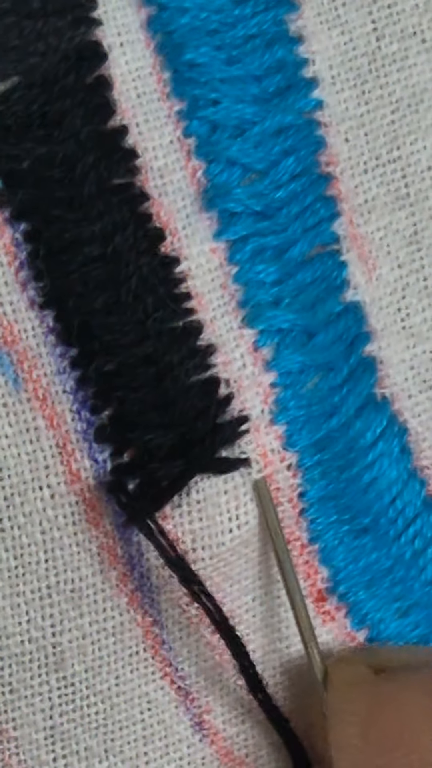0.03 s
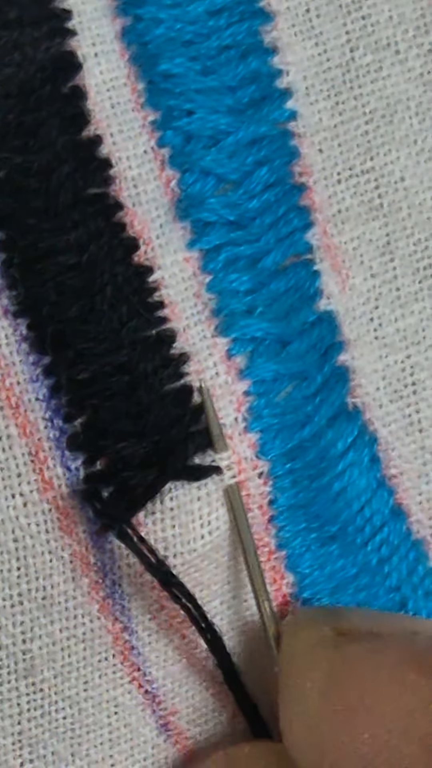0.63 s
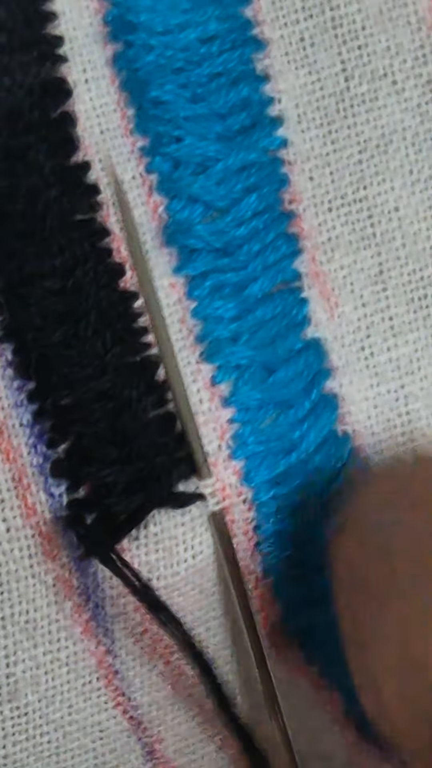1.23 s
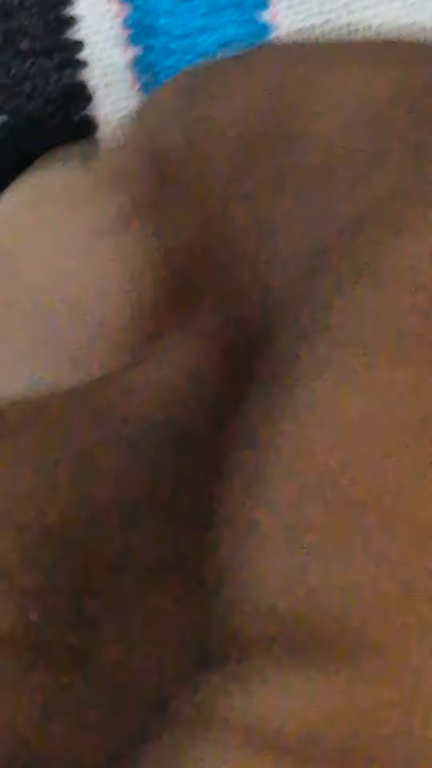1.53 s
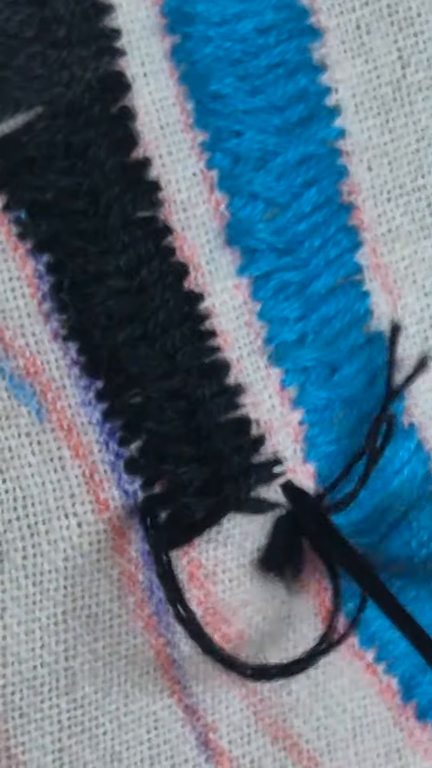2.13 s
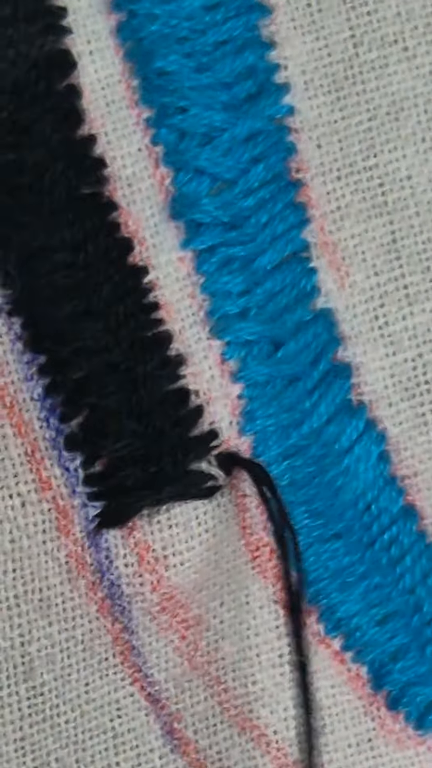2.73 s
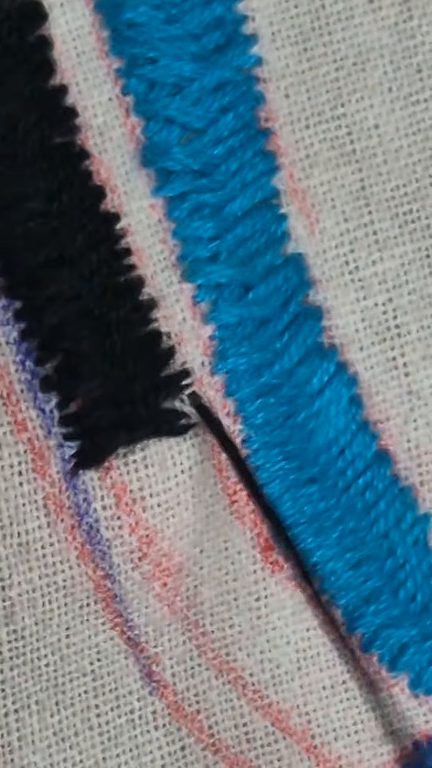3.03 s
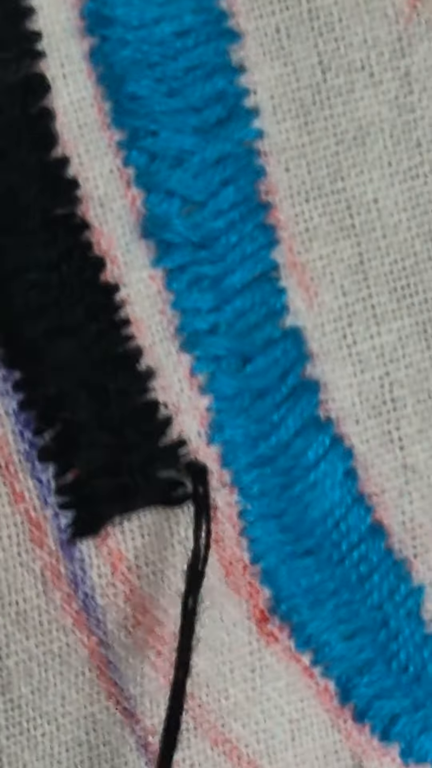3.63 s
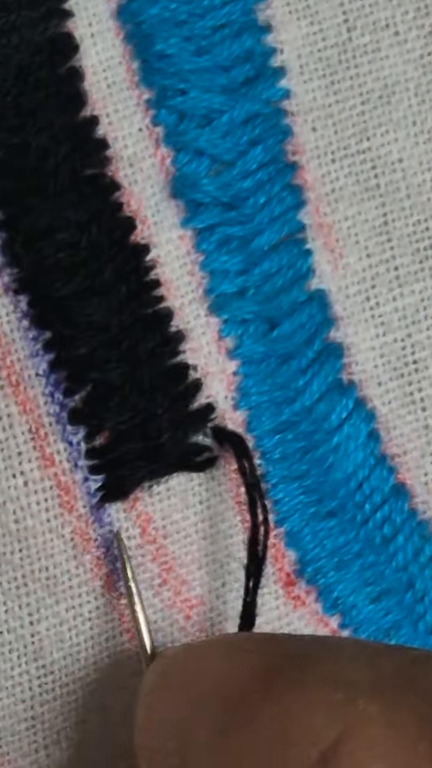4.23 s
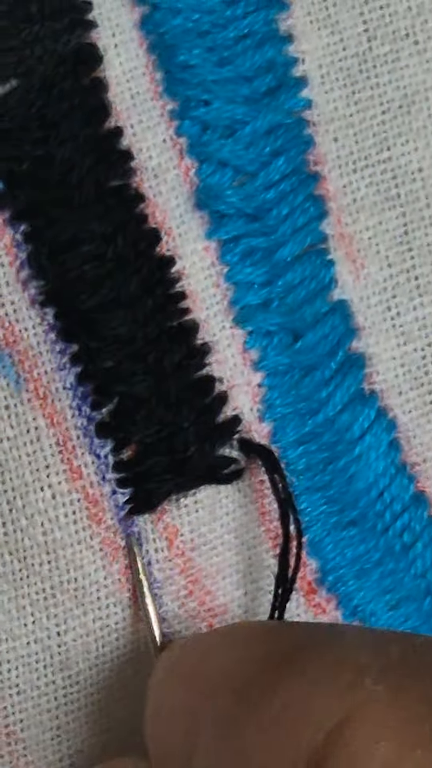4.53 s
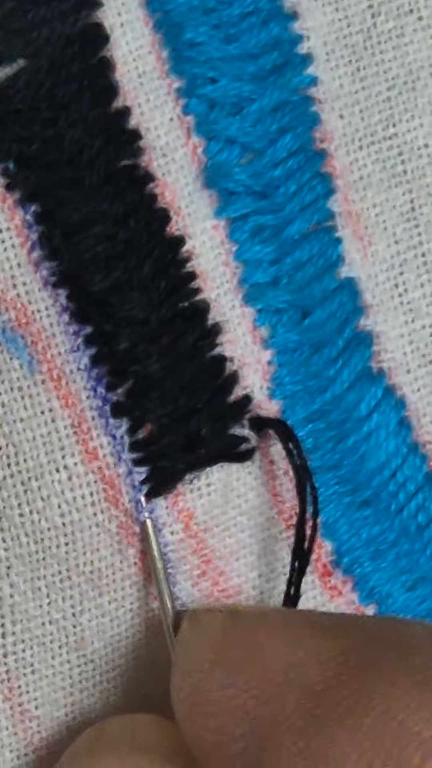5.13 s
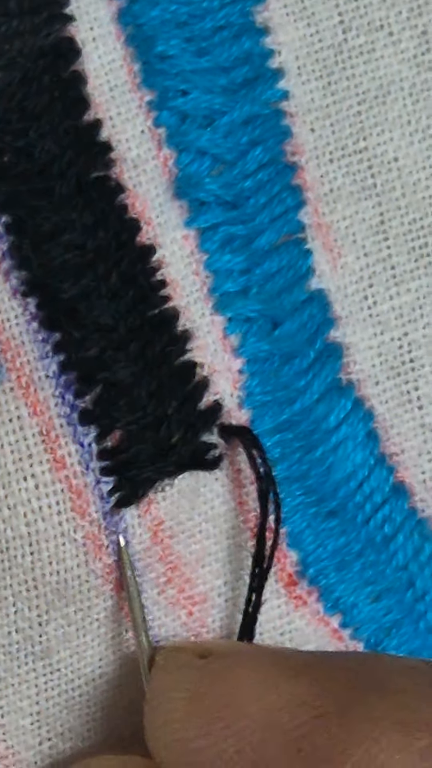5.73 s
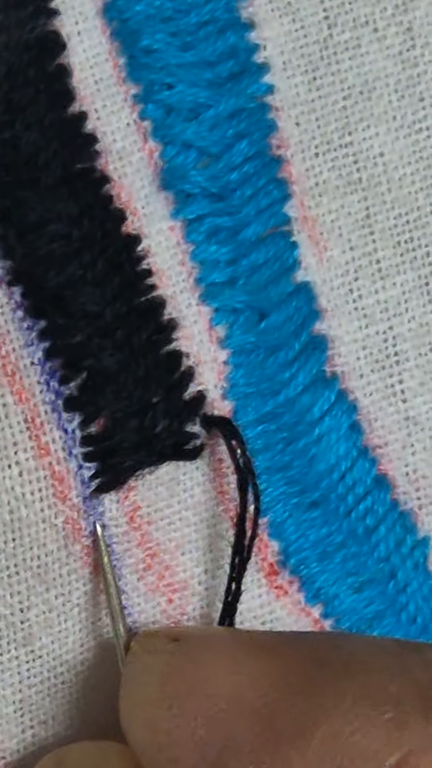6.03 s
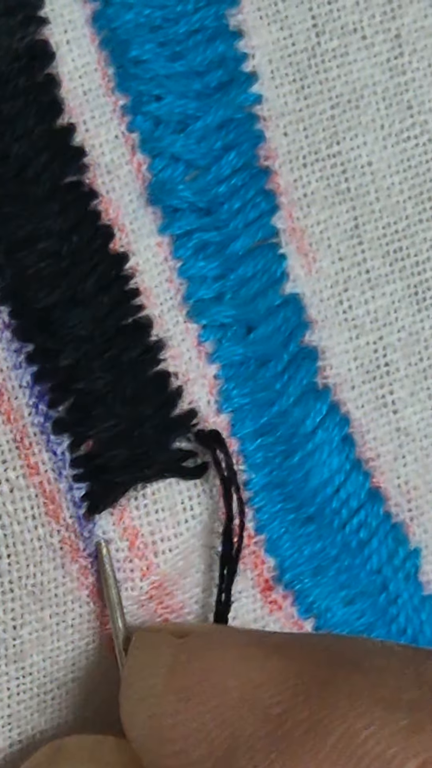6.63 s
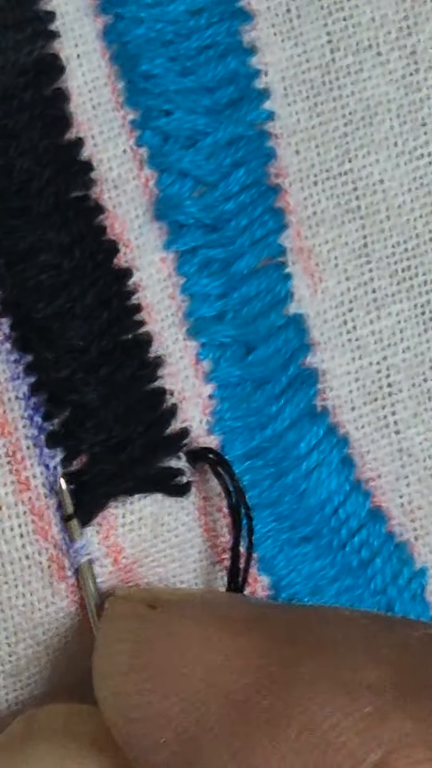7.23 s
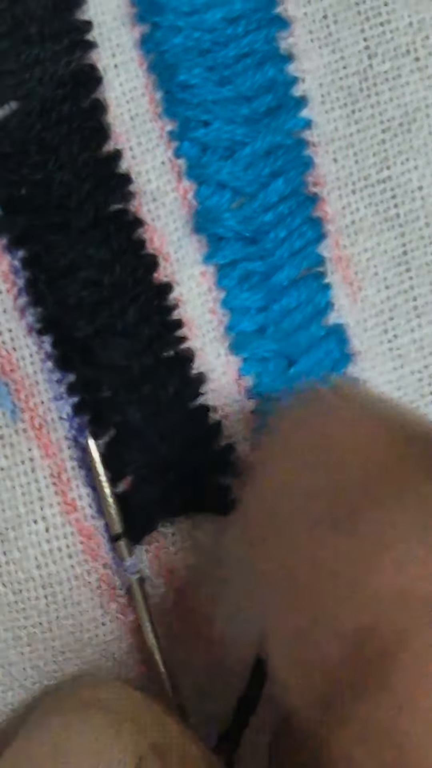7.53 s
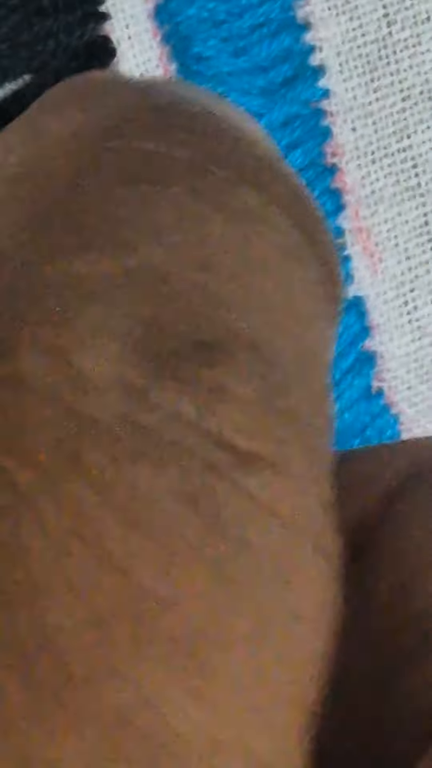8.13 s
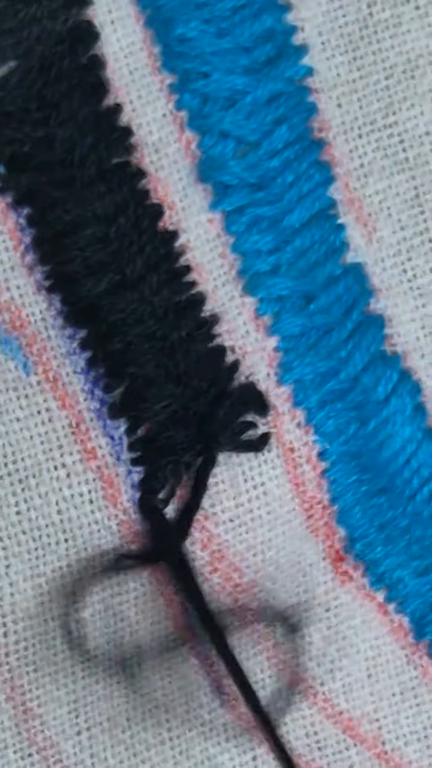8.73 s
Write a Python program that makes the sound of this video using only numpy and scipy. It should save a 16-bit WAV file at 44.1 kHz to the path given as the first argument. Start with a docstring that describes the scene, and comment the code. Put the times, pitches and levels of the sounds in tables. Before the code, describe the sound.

Faint close rustles of hand stitching and soft handling bumps over the low hum, rumble and airy hiss of a fan.

```python
"""Hand embroidery close to a phone's microphone, in a room with a fan running. From the start the
motor hums, the air rushes and hisses with a faint hollow ring, and the draught buffets the ports.
Within the first second needle and thread begin to rustle in the cloth, and handling gives soft
bumps on and off. Midway the hum and low buffeting drop away for about a second, then return.
After seven seconds a thin high whine sets in and grows to the end."""
import sys
import numpy as np
from scipy import signal
from scipy.fft import rfft, irfft, next_fast_len
from scipy.io import wavfile
from scipy.ndimage import uniform_filter1d, map_coordinates

SR = 44100
rng = np.random.default_rng(int(sys.argv[2]) if len(sys.argv) > 2 else 0)


def master_out(mix):
    """Clip the mix to full scale and print it as 16-bit PCM to the path in sys.argv[1]."""
    frames = np.transpose(np.atleast_2d(mix))
    ceiling = np.clip(frames, -1, 1)
    pcm = np.round(ceiling * 32767).astype(np.int16)
    wavfile.write(sys.argv[1], SR, pcm)


N = 392049

# Levels in the tables are relative: each source adds its own gain.
# Noise across the two microphone ports. Each row: frequency in Hz, left-right correlation.
PORT_LIKENESS = [(30, 0.53), (70, 0.53), (130, 0.84), (220, 0.85), (330, 0.93), (640, 0.38), (1000, -0.22),
                 (3000, -0.058), (7000, -0.039)]
# Balance of that noise. Each row: frequency in Hz, left minus right in dB.
PORT_BALANCE = [(200, -1), (550, -1.5), (1050, 1), (1600, -2), (3200, -1), (4500, -1), (4900, 3.5),
                (5800, 0), (7500, -0.5), (10000, 4), (11200, -1), (12400, 6), (15500, 1.5)]
# The hollow ring in the room. Each row: time in seconds, level in dB.
RING_LEVEL = [(0, -50), (.9, -45), (4.2, -51.5), (8.89, -55.5)]
# Airflow, which also sets the level of the steady rustle. Each row: time in seconds, level in dB.
AIR_LEVEL = [(0, -37.5), (.25, -37), (.85, -36), (1.05, -35), (2.0, -39), (2.6, -38), (3.4, -37),
             (3.7, -38.5), (4.3, -38.3), (4.8, -37.5), (5.5, -37), (6.0, -39), (6.42, -38.5), (6.5, -41),
             (7.8, -41), (8.89, -40.5)]
# Spectra of dull rush, hiss, eddies at the ports and cloth. Each row: frequency in Hz, density in dB.
RUSH_SPECTRUM = [(20, -3), (80, -4.5), (170, 2), (240, 1.5), (285, -2.2), (380, -0.56), (500, -5),
                 (620, -9.5), (720, -15.5), (900, -19.5), (1500, -55)]
HISS_SPECTRUM = [(300, -9.5), (930, -6), (1050, 2.5), (1250, 2.5), (1750, -2.5), (2500, -3), (3900, -2),
                 (4550, -5), (5400, -7.5), (6200, -11.5), (8000, -14.5), (11000, -19), (12500, -20.5),
                 (15700, -19)]
EDDY_SPECTRUM = [(10, -24), (19, -2), (35, 1), (65, -1), (100, -6.5), (150, -12), (240, -17), (400, -36.5),
                 (800, -71)]
CLOTH_SPECTRUM = [(1000, -27), (4500, 9.5), (6500, 8), (10000, 3.5), (11200, -2), (12400, 5.5),
                  (15700, 0.5)]
# Resonances in the hiss. Each row: centre in Hz, width in Hz, lift in dB.
HISS_RESONANCES = [(2080, 450, 5.5), (2956, 330, 4.5)]
# The motor's hum. Each row: frequency in Hz, level in dB, left minus right in dB.
MOTOR_TONES = [(79.76, 0, -0.5), (119.1, -9, 0.5)]
# The singing fan housing. Each row: frequency in Hz, level in dB.
HOUSING_TONES = [(161.8, -40.5), (171.5, -38), (360, -45), (506, -45)]
# The draught at the phone. Each row: time in seconds, hum level in dB, buffeting level in dB.
DRAUGHT_LEVELS = [(0, -26.5, -25.5), (.4, -16.5, -24.5), (.95, -20.5, -26), (1.2, -12.5, -22.5),
                  (1.6, -14.5, -21), (2.45, -17.5, -23), (2.56, -24, -28), (2.95, -16.5, -24),
                  (3.8, -19, -24.5), (4.08, -16.5, -24), (5.5, -19.5, -22), (5.92, -16.5, -24),
                  (6.1, -20.5, -28.5), (6.8, -18.5, -26.5), (7.65, -21.5, -30.5), (8.15, -18, -28.5),
                  (8.89, -27, -30)]
# Hum and low buffeting drop away, then return. Each row: start in seconds, length in seconds,
# depth in dB.
LOW_DROPS = [(0.176, 0.031, 14.5), (0.993, 0.11, 12), (1.786, 0.049, 7), (2.866, .02, 2.5),
             (3.31, 0.016, 6), (4.41, 0.6, 18.5), (5.0, 0.366, 24), (7.13, 0.024, 5), (8.28, 0.065, 11)]
# The thin whine. Each row: time in seconds, level in dB.
WHINE_LEVEL = [(7.1, -95), (7.65, -65), (8.15, -62), (8.89, -59.5)]
# Handling bumps. Each row: start in seconds, level in dB, pitch in Hz, length in seconds,
# left minus right in dB.
HANDLING_BUMPS = [(.305, -13.5, 223, 0.057, 4), (1.003, -10, 132, 0.025, 17),
                  (1.095, -6.5, 49.7, 0.075, 11), (1.167, -10.5, 105, 0.048, 22),
                  (1.598, -14.5, 211, 0.051, 16.5), (1.732, -7, 50, .06, 10), (1.825, -16, 235, 0.032, 19),
                  (1.908, -6, 60, 0.038, 20), (2.1, -11, 70, .06, 12), (2.68, -11.5, 175, 0.049, -1),
                  (4.579, -10, 85, 0.058, 14), (4.582, -11, 165, 0.027, 14), (4.742, -13, 47.7, 0.049, 2),
                  (4.853, -5, 80, 0.08, -5), (5.459, -6.5, 43.3, 0.079, 13), (5.573, -3, 44.5, 0.047, 19),
                  (5.636, -7.5, 77, 0.05, 16), (5.641, -15, 305, 0.025, 16), (6.438, -5.5, 71.7, 0.07, 18),
                  (6.46, -18.5, 150, 0.079, 11), (6.557, -6.5, 70.5, 0.047, 10), (6.8, -8, 65, 0.035, 5),
                  (7.19, -16.5, 197, .05, 7)]
# Needle and thread rub in the cloth. Each row: middle in seconds, length in seconds, level in dB.
NEEDLE_RUBS = [(.52, .09, -54), (.69, .09, -44), (0.795, 0.062, -44), (.93, .06, -46), (1.332, 0.083, -47),
               (1.51, 0.061, -43), (1.753, .09, -44), (2.75, 0.14, -51), (3.16, 0.045, -52),
               (3.34, 0.091, -51), (3.71, .06, -51), (4.0, 0.046, -47.5), (4.28, .07, -47),
               (5.07, 0.068, -47.5), (5.168, .06, -46), (5.37, 0.037, -54), (5.46, 0.046, -50),
               (5.598, .07, -44), (5.702, 0.045, -47), (5.81, .06, -51), (6, .06, -44),
               (6.087, 0.083, -47.5), (6.187, 0.047, -48), (6.383, 0.094, -49), (6.57, .07, -47.5),
               (6.897, .06, -52), (7.72, .08, -49), (8.12, .05, -47), (8.41, 0.057, -43), (8.57, .08, -48)]
# Brief dips in the rustle and, slightly, in the hiss. Each row: middle in seconds, length in seconds,
# depth in dB.
RUSTLE_DIPS = [(3.05, 0.076, 2), (3.22, 0.07, 4), (4.95, .06, 8), (5.24, .05, 6), (5.755, .05, 6),
               (6.485, 0.047, 12), (7.333, 0.045, 4), (8.33, .06, 7)]

NOISE_LEAD_S, HUM_LEAD_S = .00014, .0005  # both reach the left port first
DROP_FALL_S, DROP_RETURN_S = 0.074, 0.082
BUFFET_DROP_SHARE, HISS_DIP_SHARE = 0.61, 0.085  # shares of a drop's or a dip's depth in dB
RUSH_OVER_HISS_DB, RUSH_SAG_DB = 10, 1.5  # the rush follows the hiss, and sags in the low drops
TOP_HZ = 15750


def amp(db):
    """Decibels to gain."""
    return 10 ** (np.asarray(db) / 20)


def unit(x):
    """Scale to rms 1."""
    return x / np.sqrt(np.mean(x ** 2) + 1e-20)


def along(points, hz):
    """Read (Hz, value) points on a log axis."""
    f, v = np.transpose(points)
    return np.interp(np.log(hz + 1), np.log(f + 1), v)


def curves(rows):
    """One value per sample for each column after the time."""
    s, *cols = np.transpose(rows)
    return [np.interp(np.arange(N) / SR, s, c) for c in cols]


def wobble(rate):
    """A smooth random curve, rate knots a second."""
    steps = np.arange(0, N * rate / SR + 1, 1 / 16)
    knots = rng.standard_normal(int(N * rate / SR) + 4)
    return np.interp(np.arange(N) * rate / SR, steps, map_coordinates(knots, [steps]))


def swells(rows):
    """Summed smooth swells. Each row: middle in seconds, length at half height in seconds, height."""
    t = np.arange(0, N / SR, .002)
    total = sum(height * np.cos(np.pi / 2 * np.clip((t - s) / length, -1, 1)) ** 2
                for s, length, height in rows)
    return np.interp(np.arange(N) / SR, t, total)


def tone(hz):
    """A sine of rms 1 that follows a pitch curve."""
    return np.sqrt(2) * np.sin(2 * np.pi * (np.cumsum(hz) / SR + rng.random()))


def filtered(x, response):
    """Pass x through a frequency response."""
    m = next_fast_len(N + SR // 2)
    return irfft(rfft(x, m) * response(np.fft.rfftfreq(m, 1 / SR)), m)[..., :N]


def pan(lean_db):
    """Gains at the left and right ports."""
    return amp([[lean_db / 2], [-lean_db / 2]])


def left_first(ports, lead_s):
    """Sound arrives at the left port ahead of the right."""
    return filtered(ports, lambda hz: np.exp(2j * np.pi * np.outer([.5, -.5], hz) * lead_s))


def stereo(pair, colour):
    """Two unrelated signals, coloured (dB by Hz) and spread over both ports."""
    turn = lambda hz: np.arccos(np.clip(along(PORT_LIKENESS, hz), -1, 1)) / 2
    balance = lambda hz: amp(np.outer([.5, -.5], along(PORT_BALANCE, hz)))
    mid, side = filtered(pair, lambda hz: amp(colour(hz)) * [np.cos(turn(hz)), np.sin(turn(hz))])
    ports = filtered(np.array([mid + side, mid - side]), balance)
    return left_first(ports, NOISE_LEAD_S) / np.std(mid)


def narrow(centre_hz, width_hz):
    """Stereo noise in one narrow band."""
    band_db = lambda hz: -10 * np.log10(1 + (2 * (hz - centre_hz) / width_hz) ** 4)
    return stereo(rng.standard_normal((2, N)), band_db)


def patchy(patch_db, bins=5, frames=12):
    """Two white noises whose gain wanders in patches of frequency and time."""
    spectra = signal.stft(rng.standard_normal((2, N)), nperseg=1024)[2]
    patches = uniform_filter1d(rng.standard_normal(spectra.shape[1:]), bins, 0)
    patches = unit(uniform_filter1d(patches, frames, 1))
    depth = along([(500, .8), (1400, 1), (5000, .65), (10000, .35)], np.fft.rfftfreq(1024, 1 / SR))
    return signal.istft(spectra * amp(patch_db * depth[:, None] * patches), nperseg=1024)[1][:, :N]


def reflections(x, ripple_db, spacing_hz):
    """Room reflections leave each port its own fine peaks and dips, fading in the treble."""
    knots = rng.standard_normal((2, 4000))
    ripple = lambda hz: np.array([np.interp(hz / spacing_hz, np.arange(len(k)), k) for k in knots])
    return unit(filtered(x, lambda hz: amp(ripple_db * ripple(hz) / (1 + (hz / 7000) ** 2))))


def low_drop_db():
    """How far the low end has dropped at each moment: it falls, stays down, then returns."""
    t = np.arange(N) / SR
    drops = []
    for start, length, depth in LOW_DROPS:
        falling = 1 + (t - start) / DROP_FALL_S
        returning = 1 - (t - start - length) / DROP_RETURN_S
        drops.append(depth * np.clip(np.minimum(falling, returning), 0, 1))
    return np.max(drops, axis=0)


def room_ring(centre_hz, width_hz, waver_db):
    """In the background, a hollow ring comes and goes in the room noise."""
    return amp(curves(RING_LEVEL)[0] + waver_db * np.tanh(wobble(14))) * narrow(centre_hz, width_hz)


def fan_air(rush_gain_db, hiss_gain_db, flutter_db, flicker_db):
    """Air moving through the room: a dull rush and a restless hiss with two fixed resonances."""
    flow_db, = curves(AIR_LEVEL)
    drop = low_drop_db()
    churn = reflections(patchy(patch_db=1.2), ripple_db=1.5, spacing_hz=7)
    swirl = reflections(patchy(patch_db=1.8, bins=3, frames=7), ripple_db=1.7, spacing_hz=11)
    lift = lambda hz: sum(db / (1 + (2 * (hz - centre) / width) ** 2)
                          for centre, width, db in HISS_RESONANCES)
    rush = stereo(churn, lambda hz: along(RUSH_SPECTRUM, hz))
    hiss = stereo(swirl, lambda hz: along(HISS_SPECTRUM, hz) + lift(hz))
    rush_db = flow_db + RUSH_OVER_HISS_DB + rush_gain_db - RUSH_SAG_DB * drop / drop.max()
    hiss_db = flow_db + hiss_gain_db - HISS_DIP_SHARE * swells(RUSTLE_DIPS)
    return amp(rush_db + flutter_db * wobble(22)) * rush + amp(hiss_db + flicker_db * wobble(18)) * hiss


def fan_motor(hum_db, drift, waver_db, housing_db, port_db):
    """The motor hums on slightly unsteady tones that waver at each port; its housing sings faintly."""
    level_db = curves(DRAUGHT_LEVELS)[0] - low_drop_db() + port_db * np.array([wobble(18), wobble(12)])
    speed = 1 + drift * wobble(5)
    hum = sum(amp(db + waver_db * wobble(12)) * tone(hz * speed) * pan(lean_db)
              for hz, db, lean_db in MOTOR_TONES)
    housing = sum(amp(db + 4.04 * wobble(8.6)) * tone(hz + 2.25 * wobble(12))
                  for hz, db in HOUSING_TONES)
    return amp(level_db + hum_db) * left_first(hum, HUM_LEAD_S) + amp(housing_db) * housing


def draught(buffet_db, lump_db, lean_db):
    """Wind on the microphone: eddies hit the ports in lumps, the left one harder."""
    level_db = curves(DRAUGHT_LEVELS)[1] - BUFFET_DROP_SHARE * low_drop_db()
    eddies = stereo(rng.standard_normal((2, N)), lambda hz: along(EDDY_SPECTRUM, hz))
    return amp(level_db + buffet_db + lump_db * wobble(16)) * eddies * pan(lean_db)


def whine(pitch_hz, smear_hz, octave_db, fuzz_db):
    """A thin, wavering high tone in a skirt of narrow noise, its octave to the left."""
    pitch = pitch_hz + smear_hz * wobble(250)
    skirt = unit(filtered(rng.standard_normal((2, N)), lambda hz: 1 / (1 + ((hz - 7150) / 300) ** 2)))
    tones = tone(pitch) + amp(octave_db) * tone(2 * pitch) * pan(6)
    return amp(curves(WHINE_LEVEL)[0] + 2.2 * wobble(40)) * (tones + amp(fuzz_db) * skirt)


def handling(bump_db, thud):
    """Each soft push swings a few cycles, with a dull thud of noise, mostly nearer the left port."""
    out = np.zeros((2, N))
    rumble = unit(filtered(rng.standard_normal(N), lambda hz: amp(along(EDDY_SPECTRUM, hz / 1.37))))
    for start, db, hz, length, lean_db in HANDLING_BUMPS:
        t = np.arange(int(length * SR)) / SR
        at = round(start * SR) + np.arange(len(t))
        push = amp(db) * np.sin(np.pi * t / length)
        out[:, at] += push * (np.sin(2 * np.pi * hz * t) + thud * rumble[at]) * pan(lean_db)
    return amp(bump_db) * out


def rubbing():
    """Strength of the needle's rubs at each moment; overlapping rubs add in power."""
    return np.sqrt(swells([(s, length, amp(db) ** 2) for s, length, db in NEEDLE_RUBS]))


def cloth(rustle_db, touch_db, grain_db, catch_db, tug_db):
    """Close up, fibres slip in tiny grains, catching and letting go under the fingers and in each rub."""
    fingers = amp(curves(AIR_LEVEL)[0] + touch_db + tug_db * np.tanh(wobble(20)) - swells(RUSTLE_DIPS))
    slips = rng.standard_normal((2, N)) * amp(grain_db * wobble(700))
    catching = amp(rustle_db + catch_db * np.tanh(wobble(70)))
    return np.hypot(fingers, rubbing()) * catching * stereo(slips, lambda hz: along(CLOTH_SPECTRUM, hz))


def thread(centre_hz, width_hz, slide_db, swell_db, rub_db):
    """Near the microphone, thread rasps through the weave in one narrow band, swelling with the rubs."""
    pull_db = swell_db * np.tanh(2 * wobble(21))
    slide = amp(curves(AIR_LEVEL)[0] + slide_db + pull_db - swells(RUSTLE_DIPS))
    return np.hypot(slide, amp(rub_db) * rubbing()) * narrow(centre_hz, width_hz)


def scene():
    """From where the phone sits: room and fan behind, wind on the ports, needlework close in front."""
    fan = fan_motor(hum_db=-1.56, drift=0.01512, waver_db=2.0, housing_db=-3.5, port_db=2.0)
    fan += fan_air(rush_gain_db=0.27, hiss_gain_db=-0.46, flutter_db=1.52, flicker_db=0.72)
    needlework = cloth(rustle_db=-1.5, touch_db=-11, grain_db=1.2, catch_db=2.0, tug_db=3.5)
    needlework += thread(centre_hz=5010, width_hz=660, slide_db=-12.0, swell_db=4, rub_db=-5)
    high_whine = whine(pitch_hz=7035, smear_hz=48.2, octave_db=0, fuzz_db=7)
    wind = draught(buffet_db=4.0, lump_db=2.0, lean_db=5.5)
    bumps = handling(bump_db=-6.0, thud=0.34)
    ring = room_ring(centre_hz=1436, width_hz=89, waver_db=4.5)
    return ring + fan + wind + high_whine + bumps + needlework


def record(dry):
    """The phone rounds off the highest peaks and keeps nothing above its band limit."""
    rounded = dry / (1 + np.abs(dry / .92) ** 8) ** (1 / 8)
    return filtered(rounded, lambda hz: hz < TOP_HZ)


dry = scene()
out = record(dry)
master_out(out)
```